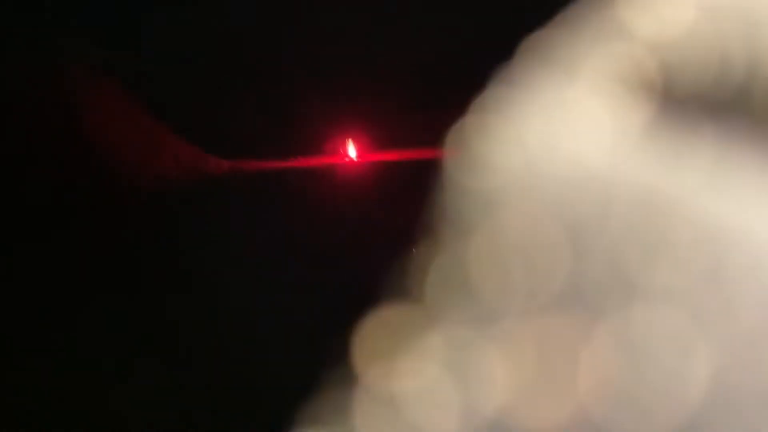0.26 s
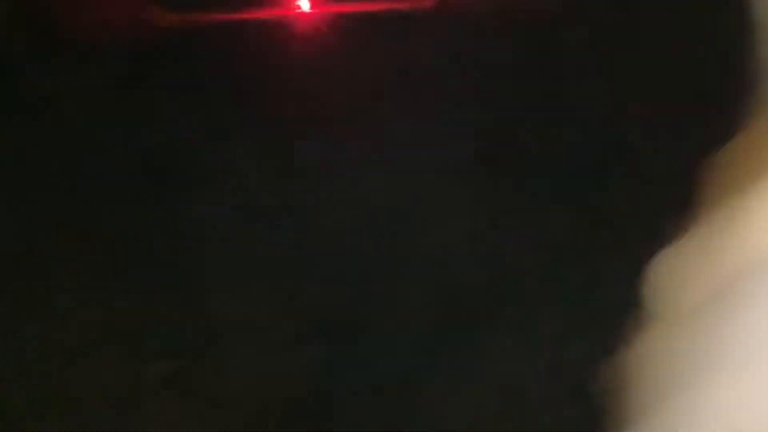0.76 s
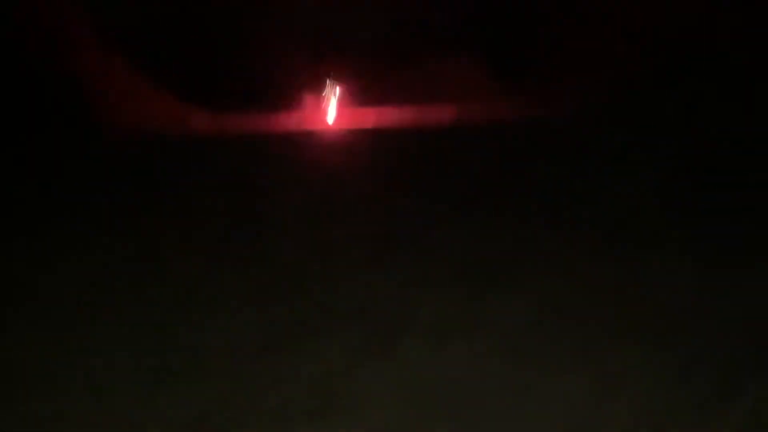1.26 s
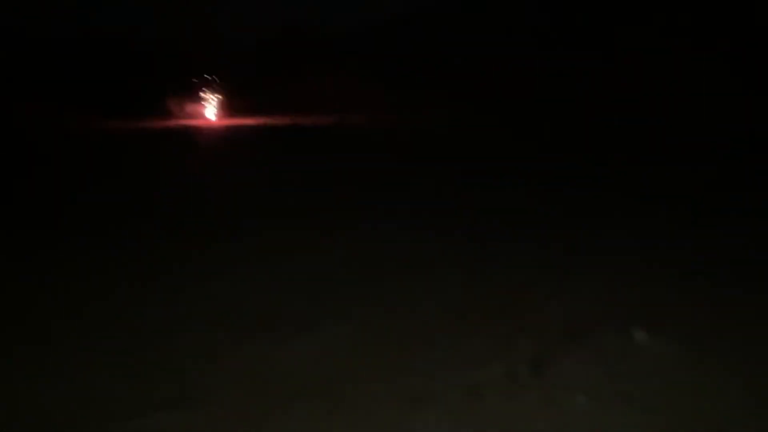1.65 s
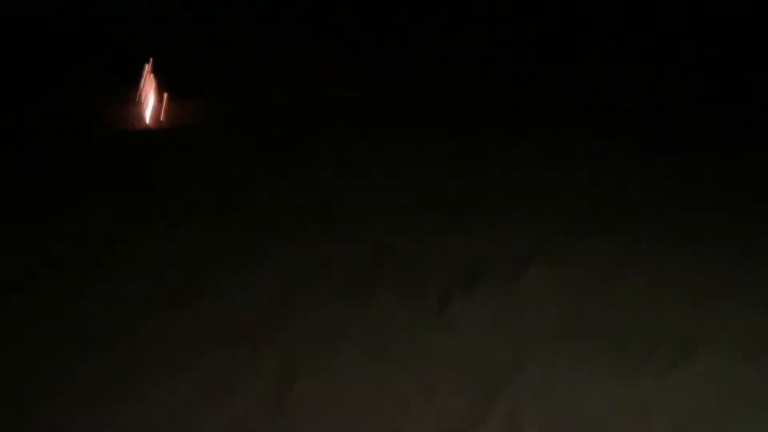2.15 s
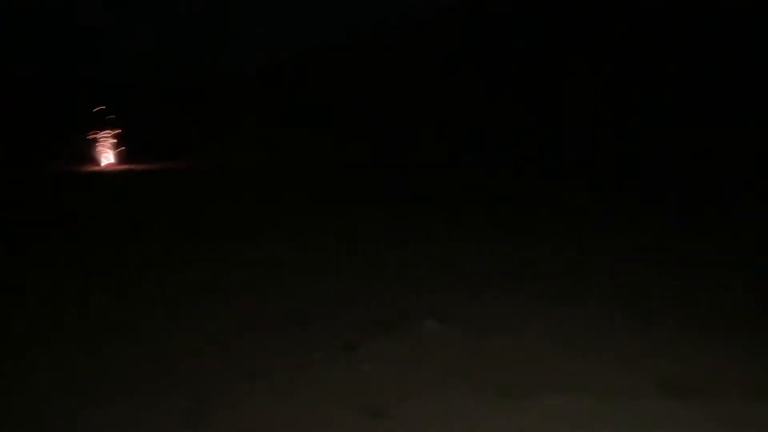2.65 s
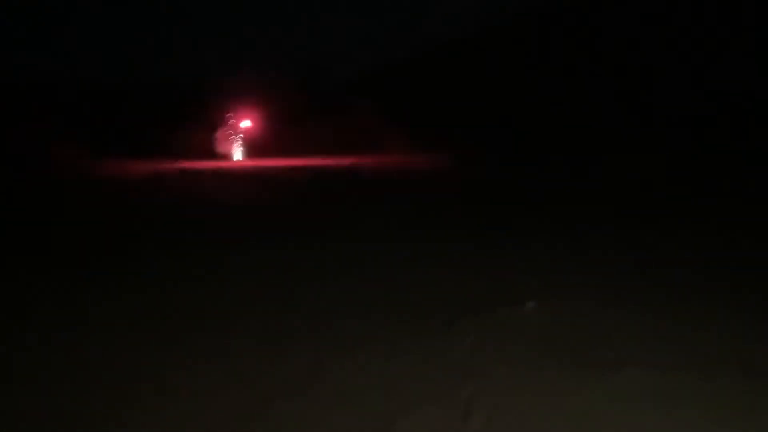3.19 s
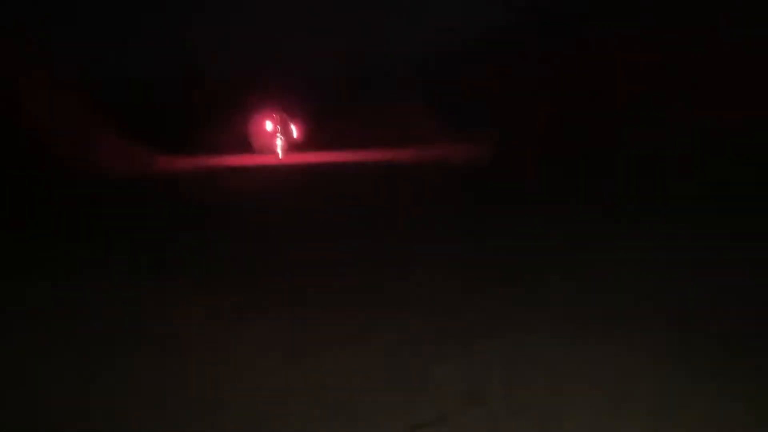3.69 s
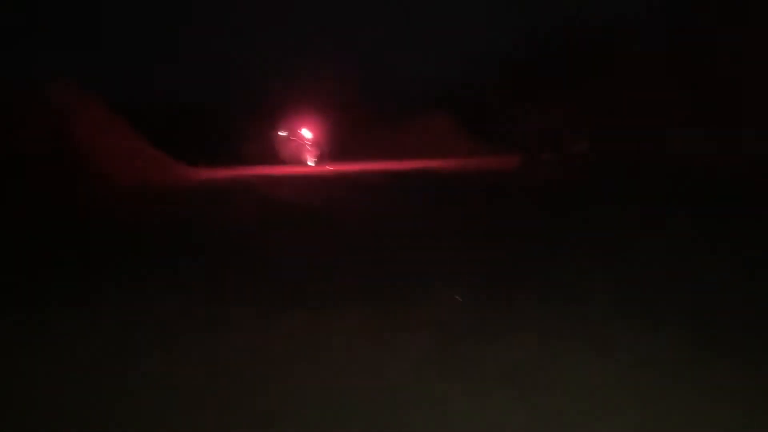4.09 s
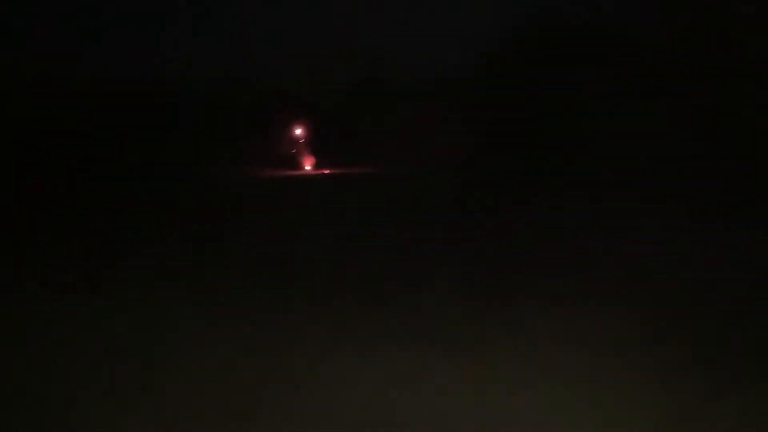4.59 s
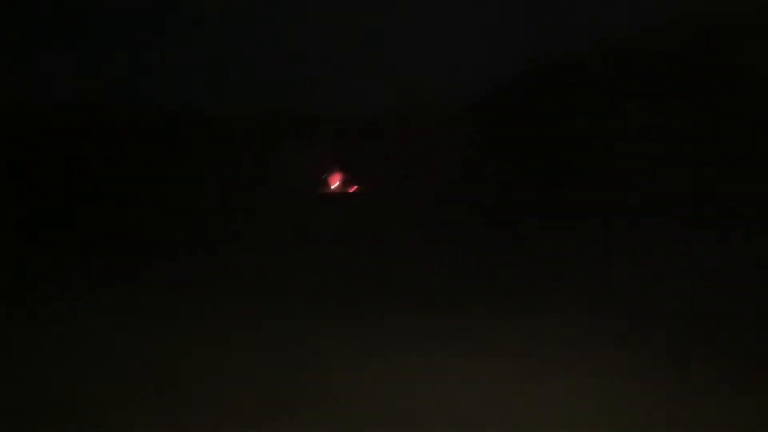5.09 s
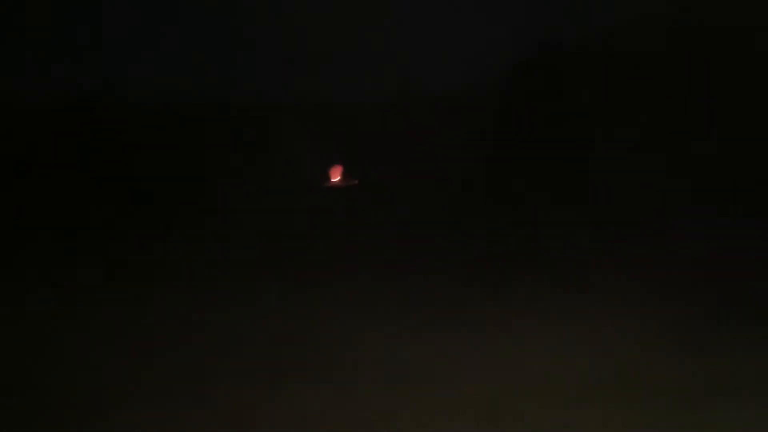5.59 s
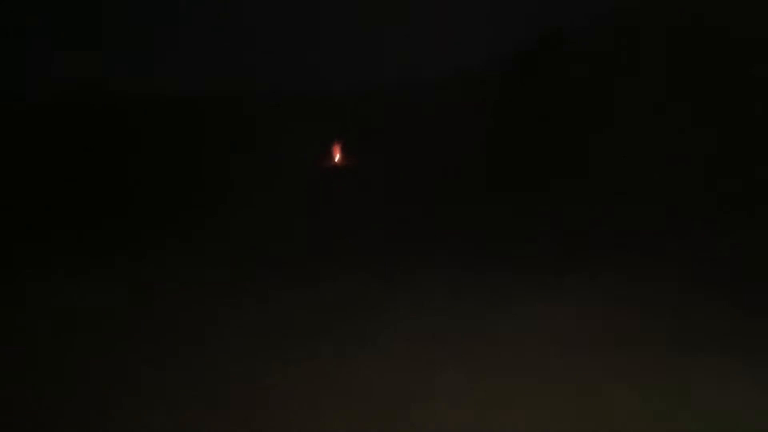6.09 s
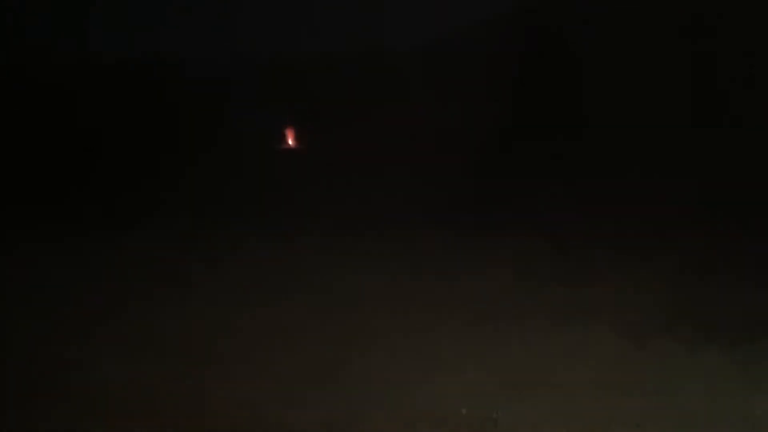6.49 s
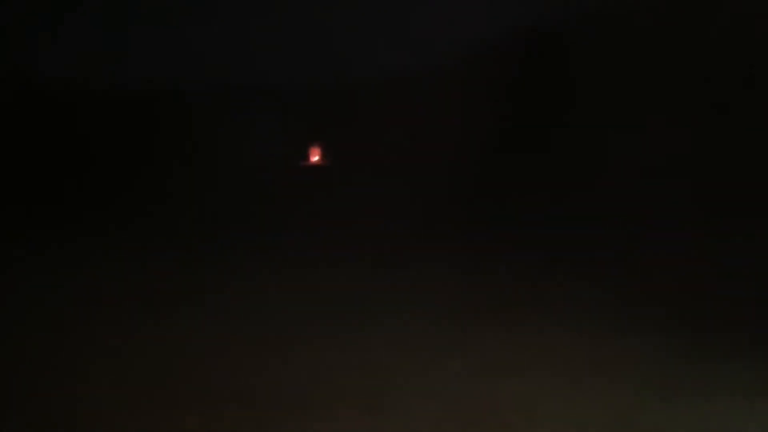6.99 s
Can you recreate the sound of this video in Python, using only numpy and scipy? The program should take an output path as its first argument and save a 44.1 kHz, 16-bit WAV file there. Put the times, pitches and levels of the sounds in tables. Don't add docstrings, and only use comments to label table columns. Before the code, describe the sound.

A ground firework sputters and crackles alight, then screams with a shrill whistle gliding steadily down in pitch, while wind buffets the microphone.

```python
import sys
import numpy as np
from scipy import signal
from scipy.fft import rfft, irfft, next_fast_len
from scipy.io import wavfile
from scipy.ndimage import uniform_filter1d

SR = 44100
rng = np.random.default_rng(int(sys.argv[2]) if len(sys.argv) > 2 else 0)


def transcribe(u):
    v = np.clip(np.atleast_2d(u).T, -1, 1)
    q = np.round(v * 32767).astype(np.int16)
    wavfile.write(sys.argv[1], SR, q)


def amplitude_ratio(level_db):
    exponent = np.asarray(level_db, float) / 20
    return 10 ** exponent


N = 319725
T = np.arange(N) / SR

# time in seconds, pitch in Hz.
PITCH = [(.7, 3866), (1.0, 3627), (1.28, 3493), (1.56, 3103), (1.84, 2879), (2.4, 2524), (2.6, 2452),
         (2.82, 2328), (2.96, 2261), (3.2, 2280), (3.66, 2136), (3.94, 2060), (4.25, 2005), (5.06, 1922),
         (5.5, 1840), (6.0, 1762), (6.75, 1692), (7.25, 1652)]
# time in seconds, whistle in dB, overtones in dB,
# brightness in dB per multiple.
SCREAM = [(.2, -60.5, -68, -9), (.5, -32.5, -62, 0.1), (.86, -31, -45, 0.1), (1.0, -23.5, -42, 2),
          (1.28, -25.5, -25, -18), (1.5, -15.5, -37, 5), (1.82, -3, -13.5, 4.5), (2.12, -18, -28, -6),
          (2.4, -20, -30.5, -3.5), (2.56, -24.5, -40.5, -11), (3.05, -18.5, -31.5, -13),
          (3.5, -23.5, -36, -4), (3.88, -19.5, -23, 0.5), (4.7, -20, -30.5, -3), (5.3, -23.5, -24, -2.5),
          (5.76, -24, -28.5, -4.5), (6.15, -24.5, -33, -1), (7.25, -27.5, -40, 1.5)]
# time in seconds, raggedness (a factor),
# share of clean tone from 0 to 1, sparks per second.
BURNING = [(0, 1.5, 0, 30), (.5, 1.5, 0, 60), (.82, 1.5, 0, 200), (.95, 1.6, .1, 400), (1.05, 1.6, .5, 80),
           (1.2, 1.8, .7, 30), (1.55, 2.0, .55, 0), (1.95, 2.1, .6, 0), (2.15, .7, .97, 0),
           (2.45, .7, .93, 0), (2.6, 1.0, .8, 0), (2.8, .7, .9, 0), (3.0, .5, .95, 0), (3.9, .5, .97, 0),
           (4.1, .32, .98, 0), (7.25, .28, .98, 0)]
# multiple of the pitch, level in dB.
OVERTONES = [(2, -15.5), (3, -13.5), (4, -16.5), (5, -23.5), (6, -31)]
# time in seconds, its own level in dB, level of its mixing tones in dB.
LOW_TONE = [(.41, -56, -58), (1.56, -24, -36), (2.1, -31, -40), (2.45, -31.5, -48), (2.7, -31.5, -30),
            (3.0, -31.5, -27), (3.35, -33, -32.5), (3.6, -40.5, -33.5), (3.9, -40, -40), (4.2, -61, -35),
            (4.55, -48, -30.5), (4.8, -43, -30), (5.4, -39.5, -27.5), (5.75, -38.5, -39),
            (6.1, -44.5, -36.5), (6.6, -42.5, -46), (6.95, -42, -36), (7.25, -37, -35)]
# multiple of the whistle, multiple of the low tone,
# level in dB.
MIXING = [(0, 1, -4), (1, -1, -6.5), (0.999, 1, -3), (1.999, 1, -13.5), (3, 1, -14.5)]
# time in seconds, rise in seconds, fall in seconds, pitch lift in Hz.
HITCHES = [
    (1.8, .2, 0.059, 70),
    (2.66, 0.021, 0.12, 40.5),
    (3.735, 0.0952, 0.028, 22.5),
    (3.77, 0.035, 0.0378, -19.5),
    (3.86, 0.088, 0.013, 63.5),
    (1.84, 0.0385, 0.016, -69),
    (2.1, 0.0597, 0.0184, -61.5),
    (3.21, 0.1107, 0.108, 12),
    (6.8, 0.066, 0.092, -13),
    (5.55, 0.0667, 0.021, 20),
]
# time in seconds, half length in seconds,
# whistle lost in dB (negative is a gain).
STUMBLES = [
    (3.071, 0.0069, -2),
    (5.432, 0.09, -2),
    (6.023, 0.029, 9),
    (6.748, 0.0044, 13),
    (7.0, 0.025, 4),
    (7.101, 0.022, 9),
    (7.179, 0.028, 9),
]
# frequency in Hz, level in dB.
ROAR_COLOUR = [(2800, -37), (4000, 9), (5200, 14), (6800, -21), (9000, -16)]
# time in seconds, level in dB.
JET = [(0, -51), (.13, -70), (.19, -72), (.5, -49), (.86, -54.5), (1.0, -41.5), (1.35, -38), (1.6, -38),
       (1.85, -28.5), (2.3, -48.5), (2.9, -43.5), (3.4, -49), (4.3, -51), (5.3, -43), (5.8, -43.5),
       (6.3, -57), (7.25, -47.5)]
# frequency in Hz, level in dB.
HISS = [(400, -8.5), (900, 3.5), (1800, 9), (3500, 6), (6000, 5), (9000, -56), (12000, -56)]
# frequency in Hz, level in dB.
DAMP_HISS = [(400, -9), (1700, 7.5), (2700, -8), (3900, 10), (5200, -7), (8000, -14), (12000, 3),
             (16000, -4)]
# crest in seconds, rise in seconds,
# fall in seconds, level in dB.
FLARES = [
    (0.93, 0.23, 0.8, 19.5),
    (.76, .05, .06, 19),
    (1.6, 1, 1.34, 18.5),
    (2.76, 0.63, 0.86, 21),
    (3.95, 0.71, 0.48, 22.5),
    (4.2, 0.36, 0.45, 21.5),
    (5.5, 0.19, 0.8, 19.5),
    (6.9, 0.27, 0.27, 6),
    (3.25, 0.35, 0.28, 15),
    (4.62, 0.22, 0.23, 8.5),
]
# frequency in Hz, level in dB.
FIZZ_COLOUR = [(2500, -42), (4300, -18), (6500, -6), (10000, -8), (13000, -17), (15500, -14.5)]
# time in seconds, level in dB.
EARLY_POPS = [(0.0237, -40), (0.0884, -39), (.3303, -39), (0.3416, -33.5), (0.391, -37), (0.522, -17.5),
              (0.5256, -31), (.603, -34.5), (0.407, -32), (.432, -25), (0.4639, -21.5), (.5023, -40),
              (0.5327, -23), (0.5561, -21), (0.58, -51), (0.5958, -25.5), (0.616, -19), (.629, -42),
              (0.6509, -12), (0.664, -22.5), (0.686, -57), (0.7147, -15.5), (0.76, -17.5), (0.7785, -32),
              (0.7947, -13.5)]
# time in seconds, level in dB, choke of
# the whistle in dB.
CRACKS = [(.853, -28, -2), (0.8619, -25, 5), (0.895, -27, -2), (0.903, -18, -10), (.925, -29, -1),
          (.961, -19, 0), (1.162, -38, 2), (1.198, -39, 3), (1.225, -34, 12), (1.238, -25, -4),
          (1.287, -29, -3.5), (0.8833, -29, 8), (.944, -17, -4), (1.138, -20, 20), (.824, -19.5, 15.5),
          (0.848, -17, -4), (0.8766, -15, -8), (0.9105, -16, 9), (0.931, -13, 8), (0.9562, -14, -15),
          (0.969, -19.5, 22), (.988, -25.5, 4.5), (0.9999, -25, -7), (1.009, -13.5, 16), (1.03, -16, 5.5),
          (1.045, -4, 19), (1.079, -11.5, 21), (1.1066, -11, 15), (1.0637, -28, 2), (1.179, -35, 3),
          (1.328, -22, 1), (1.337, -28, 0), (1.343, -30, 3), (1.374, -37, 1), (1.385, -20, 3),
          (1.394, -46, 5), (1.432, -21, 2), (1.666, -38, 1), (1.807, -22, 6), (1.1275, -6.5, 7),
          (1.1575, -9, 18), (1.2432, -15, 14), (1.2667, -28, 10.5), (1.3015, -22, 1.5), (1.315, -15, 5),
          (1.351, -26.5, 12), (1.415, -32, 8), (1.448, -16, 23), (1.504, -25, 13), (1.5587, -17.5, 21.5),
          (1.8477, -15.5, 19.5)]
# frequency in Hz, level in dB.
CRACK_COLOUR = [(1500, 0), (3000, 11.5), (5000, 12.5), (9500, 13.5), (13000, 0), (16000, 2)]
# frequency in Hz, level in dB.
PATH = [(4300, 0), (5000, -6), (5600, 0), (8300, 0), (9000, -6), (9800, -3), (12000, -6), (15500, -12),
        (16500, -50)]
# frequency in Hz, lead of the left port in radians.
LEAD = [(1600, .1), (2240, 2.42), (2750, 3.8), (4350, 6.25), (5150, 7.3), (6400, 6.8), (8870, 8.6),
        (9900, 6.35)]
# frequency in Hz, time to fall by 60 dB in seconds.
YARD = [(500, 0.4), (2000, 0.51), (8000, 0.053)]
# time in seconds, level in dB, centre in Hz, left over right in dB.
SLAPS = [(0.06, -24, 126, 14), (0.48, -15.5, 202, 2), (.501, -15, 420, -8), (0.52, -6, 310, -2),
         (0.54, -6.5, 274, -4), (0.597, -11, 390, -8), (0.614, -13, 141, 6), (0.722, -22, 312, -7),
         (0.84, -18, 204, 15), (0.897, -17.5, 228, 9), (1.035, -11.5, 235, 6), (1.158, -12.5, 239, 13.5),
         (1.222, 0, 145, 2), (.935, -15, 110, 2), (1.172, -18, 95, 3), (.643, -20, 520, -8),
         (.735, -24, 450, -3), (1.207, -17, 300, 0), (.757, -22, 510, -11), (.785, -26, 330, -4),
         (.812, -23, 590, -12), (5.83, -25, 420, -8), (1.51, -14, 419.5, -10), (2.038, -10, 171, 8),
         (2.59, -14, 122, 3), (2.685, -4, 343.5, -5), (2.686, -4.5, 735, -13), (0.542, -12, 920, -17),
         (0.604, -13, 990, -13), (.523, -16, 800, -17), (2.803, -4.5, 257, 5), (2.814, -6.5, 128, 0),
         (2.968, -16, 196, -7), (3.284, -21, 182, -5), (3.964, -13.5, 186, 6), (5.409, -14.5, 197, 0),
         (5.488, -12, 99.9, -7), (5.513, -11.5, 149, -5), (5.792, -33, 139.4, -.5), (5.799, -21.5, 331, 2),
         (5.815, -24, 300, 4), (5.858, -26, 291, -4), (4.069, -34, 600, -15), (5.876, -10.5, 98, -1)]
# time in seconds, level in dB.
WIND = [(0.0, -39), (.3, -43), (.58, -32), (.72, -38.5), (.89, -20.5), (1.08, -34.5), (1.2, -26.5),
        (1.38, -37.5), (1.71, -20.5), (2.16, -22.5), (2.3, -33.5), (2.75, -22.5), (2.9, -30), (4.2, -37.5),
        (5.25, -40), (5.5, -34), (6.2, -43), (7.1, -35.5)]
# time in seconds, half length in seconds, rumble in dB, flutter in dB.
BUFFETS = [(0.071, 0.13, -28.5, -39.5), (0.541, 0.12, -27, -16.5), (0.62, 0.095, -27, -15),
           (0.787, 0.13, -34, -24), (1.168, 0.041, -30, -17.5), (1.238, 0.077, -20, -22),
           (1.689, 0.15, -30, -24), (2.594, 0.027, -28, -17.5), (2.699, 0.024, -41, -13.5),
           (2.814, 0.027, -28, -21.5), (3.6, 0.24, -31, -32.5), (4.158, 0.065, -22.5, -32.5),
           (4.368, 0.14, -28.5, -48), (5.491, 0.049, -35, -35.5), (5.81, 0.056, -27.5, -29.5),
           (5.876, 0.054, -21.5, -28), (6.623, 0.14, -37.5, -41), (6.98, 0.062, -25.5, -35),
           (7.148, 0.047, -21.5, -32.5)]
# frequency in Hz, level in dB.
RUMBLE = [(20, -46.5), (35, -15.5), (55, -2), (90, 0.5), (150, -10), (300, -41), (600, -67), (2000, -100)]
# frequency in Hz, level in dB.
FLUTTER = [(60, -44), (140, 5), (250, 2), (400, -4.5), (700, -16), (1200, -19), (2000, -40.5), (4000, -100)]
# start in seconds, end in seconds,
# low edge in Hz, high edge in Hz, share of the time lost from 0 to 1.
HOLES = [
    (.5, 1.45, 2380, 2750, .7),
    (1.45, 2.1, 2380, 2560, .75),
    (1.3, 5.3, 8750, 9300, .55),
    (5.3, 7.25, 8750, 9100, .12),
    (1.6, 3.9, 4950, 5150, .3),
    (2.1, 7.25, 7050, 7400, .12),
    (4.4, 7.25, 11800, 14000, .35),
    (1.2, 7.25, 12500, 14500, .4),
    (1.2, 7.25, 14500, 16600, .75),
    (2, 7.25, 9250, 12500, .1),
]


def evened(x):
    return x / np.sqrt(np.mean(x ** 2) + 1e-20)


def read(points, hz):
    f, value = np.transpose(points)
    return np.interp(np.log(hz + 1), np.log(f + 1), value)


def column(rows, k):
    return np.interp(T, np.array(rows)[:, 0], np.array(rows)[:, k])


def coloured(x, points):
    n = x.shape[-1]
    return irfft(rfft(x) * amplitude_ratio(read(points, np.fft.rfftfreq(n, 1 / SR))), n)


def drift(rate_hz, channels=1):
    white = rng.standard_normal((channels, N))
    return evened(signal.lfilter(*signal.butter(2, rate_hz, fs=SR), white))


def swell(s, rise, fall):
    return np.interp(T, [s - rise, s, s + fall], [0, 1, 0])


def wave(turns):
    return np.cos(2 * np.pi * turns)


def fuzz(turns, width_hz):
    a, b = drift(width_hz, channels=2)
    return a * wave(turns) + b * np.sin(2 * np.pi * turns)


def add(mix, s, sound):
    part = mix[..., round(s * SR):][..., :sound.shape[-1]]
    part += sound[..., :part.shape[-1]]


def tube_tone(turns, clean):
    halo = 0.8 * clean * fuzz(turns, 248) + 0.23 * fuzz(1.03 * turns, 1250)
    clear = np.sqrt(2) * wave(turns) + 0.33 * fuzz(turns, 52)
    return np.sqrt(clean) * clear + np.sqrt(1 - clean) * halo


def overtones(turns, pitch):
    out, bright_db = np.zeros(N), column(SCREAM, 3)
    for k, db in OVERTONES:
        faint_db = -np.maximum(k * pitch - 11000, 0) / 250
        line = 0.82 * wave(k * turns) + 0.36 * fuzz(k * turns, 28 * k)
        out += amplitude_ratio(db + faint_db + (k - 3) * bright_db) * line
    return out


def mixing_tones(turns, pitch, glide, clean, unrest):
    free_hz = 1202
    free_pitch = free_hz * (1 + 0.0068 * unrest * drift(32.2)[0])
    low = np.cumsum(np.minimum(pitch / 2, free_pitch)) / SR
    locked = np.clip((2.1 * free_hz - glide) / 200, .1, 1)
    sharp = clean * np.interp(glide, [2100, 2250], [.35, 1])
    low_db, mixing_db = column(LOW_TONE, 1), column(LOW_TONE, 2)
    out = np.zeros(N)
    for k, m, db in MIXING:
        both = k * turns + m * low
        level = amplitude_ratio(db + (mixing_db if k * m > 0 else low_db)) * locked ** (k > 1)
        out += level * (0.5 * sharp * wave(both) + 0.31 * fuzz(both, 40 + 20 * k))
    return out + amplitude_ratio(mixing_db - 15.5 + 7.4 * swell(2.95, .2, 0.32)) * fuzz(.86 * turns, 60)


def whistle():
    unrest, clean = column(BURNING, 1), np.clip(column(BURNING, 2), 0, 1)
    glide = column(PITCH, 1) + sum(hz * swell(s, rise, fall) for s, rise, fall, hz in HITCHES)
    uneven = 1 + .003 * drift(5)[0]
    shaky = 1 + .006 * unrest * drift(35)[0] + .007 * unrest * drift(160)[0]
    pitch = glide * uneven * shaky
    turns = np.cumsum(pitch) / SR
    lost_db = sum(db * swell(s, half, half) for s, half, db in STUMBLES)
    flicker = amplitude_ratio(0.12 * unrest * np.tanh(drift(100)[0]) - lost_db)
    settled = np.interp(T, [1.2, 1.8], [0, 1])
    upper = amplitude_ratio(column(SCREAM, 2)) * overtones(turns, pitch)
    upper += mixing_tones(turns, pitch, glide, clean, unrest)
    return flicker * (amplitude_ratio(column(SCREAM, 1)) * tube_tone(turns, clean) + settled * upper)


def roar():
    rush = rng.standard_normal(N) * amplitude_ratio(3.2 * drift(70)[0])
    return amplitude_ratio(-31) * swell(1.45, 0.5, .62) * evened(coloured(rush, ROAR_COLOUR))


def choke(regrow_s):
    dip_db, u = np.zeros(N), np.arange(2500) / SR
    early = [(*row, 10.5) for row in EARLY_POPS]
    for s, _, depth_db in early + CRACKS:
        dip = np.minimum(u / 0.00056, 1) * np.exp(-(u / regrow_s) ** 2)
        add(dip_db, s + 0.0029, max(depth_db, 0) * dip)
    return amplitude_ratio(-np.minimum(dip_db, 30))


def flame():
    sputter = amplitude_ratio(2.0 * drift(90)[0]) * amplitude_ratio(1.0 * drift(8.3)[0])
    calming = np.interp(T, [2, 2.4], [1, .4])
    jet, edge = rng.standard_normal((2, N)) * sputter ** calming
    caught = np.interp(T, [.85, 1.05], [0, 1])
    hiss = caught * evened(coloured(jet, HISS))
    hiss += (1 - caught) * amplitude_ratio(1.5) * evened(coloured(jet, DAMP_HISS))
    spark_size = amplitude_ratio(4.2 * np.minimum(rng.exponential(1, N), 3)) * rng.choice([-1, 1], N)
    sparks = (rng.random(N) < column(BURNING, 3) / SR) * spark_size
    body = amplitude_ratio(column(JET, 1) + 0.5) * (hiss + 3.7 * coloured(sparks, CRACK_COLOUR))
    flare_db = np.max([db * np.minimum(1.3 * swell(s, rise, fall), 1)
                       for s, rise, fall, db in FLARES], axis=0)
    unlit_db = -14.5 * swell(.2, 1, .3)
    fizz = amplitude_ratio(-61.5 + unlit_db + flare_db) * amplitude_ratio(1.0 * drift(6)[0])
    fizz = fizz * evened(coloured(edge, FIZZ_COLOUR))
    return body * choke(0.013) + fizz * choke(0.01)


def pops():
    out, u, pitch = np.zeros(N), np.arange(600) / SR, column(PITCH, 1)
    grit = rng.standard_normal((len(EARLY_POPS + CRACKS), 600))
    for (s, db, *_), g in zip(EARLY_POPS + CRACKS, grit):
        away = abs(u - .0015)
        burst = g * np.exp(-away / np.where(u < .0015, .00015, .0007))
        shock = 2.0 * (np.arange(600) == 66) + burst
        crack = coloured(shock, CRACK_COLOUR + [(17000, -37.0)])
        ring = np.sin(2 * np.pi * pitch[round(s * SR)] * 1.139 * u) * np.exp(-away / 0.00018)
        ring_db = -15.5 + 0.16 * db + min(db + 29.5, 0)
        add(out, s, amplitude_ratio(db) * 1.02 * crack / abs(crack).max() + amplitude_ratio(ring_db) * ring)
    return out


def ports(x):
    n = next_fast_len(N + 2048)
    half = np.exp(.5j * read(LEAD, np.fft.rfftfreq(n, 1 / SR)))
    return irfft(rfft(x, n) * np.array([half, 1 / half]), n)[:, :N]


def yard(x):
    taps = np.zeros((2, SR // 2))
    at = np.arange(200, SR // 2 - 20, 20) + rng.integers(0, 20, (2, (SR // 2 - 201) // 20))
    np.put_along_axis(taps, at, rng.choice([-1., 1.], at.shape), 1)
    hz, t, z = signal.stft(taps, SR, nperseg=256)
    fade = amplitude_ratio(-60 * t / read(YARD, hz)[:, None])
    tail = signal.istft(z * fade, SR, nperseg=256)[1]
    return signal.fftconvolve(x[None], tail / np.linalg.norm(tail[0]), axes=1)[:, :N]


def slaps():
    out, u = np.zeros((2, N)), np.arange(2200) / SR
    band = signal.butter(4, [300, 1400], "band", fs=SR)
    grit = signal.lfilter(*band, rng.standard_normal((len(SLAPS), 2, 2200)))
    for (s, db, hz, pan_db), g in zip(SLAPS, grit):
        hump = np.sin(np.pi * np.minimum(u * hz / 3.05, 1)) ** 2
        push = hump * np.sin(2 * np.pi * hz * u * (1.2 - 8 * u))
        rasp_db = -29 + 0.0631 * np.clip(hz - 250, 0, 140)
        rasp = np.sin(np.pi * np.minimum(u / 0.014, 1)) ** 2 * g * 5.4 * amplitude_ratio(rasp_db)
        sides = amplitude_ratio(np.array([[pan_db / 2], [-pan_db / 2]]))
        add(out, s, amplitude_ratio(db - 5.0) * sides * (push + rasp))
    return out


def gusts(steady, k, points, shared, lump_db, lump_hz):
    a, b, c = rng.standard_normal((3, N))
    pair = np.sqrt(shared) * a + np.sqrt(1 - shared) * np.array([b, c])
    buffets = [amplitude_ratio(row[k]) * swell(row[0], row[1], row[1]) ** 2 for row in BUFFETS]
    push = np.max([steady] + buffets, axis=0)
    lumps = amplitude_ratio(lump_db * np.tanh(drift(lump_hz)))
    return push * evened(coloured(pair, points) * lumps)


def wind():
    gust_db = column(WIND, 1)
    flutter_db = -40.5 + 0.78 * (gust_db + 35.5)
    rumble = gusts(amplitude_ratio(gust_db), 2, RUMBLE, shared=0.68, lump_db=3.1, lump_hz=20.0)
    return rumble + gusts(amplitude_ratio(flutter_db), 3, FLUTTER, shared=0.042, lump_db=7.3, lump_hz=20.2)


def night_air():
    colour = [(200, -8.0), (1500, 32.0), (4000, -16), (9000, -23), (16000, -57)]  # (Hz, dB)
    return amplitude_ratio(-62) * evened(coloured(rng.standard_normal((2, N)), colour))


def masked(x):
    hz, t, z = signal.stft(x.mean(0), SR, nperseg=1024)
    pitch = np.interp(t, *np.transpose(PITCH))
    above = hz[:, None] > pitch + 360
    below = hz[:, None] < np.maximum(pitch + 620, 3040)
    share = .82 * (above & below & (t > 2.05))
    for start, end, low, high, part in HOLES:
        share += part * np.outer((hz > low) & (hz < high), (t > start) & (t < end))
    chance = np.repeat(np.repeat(rng.random((len(t) // 4 + 1, 65)), 4, axis=0), 8, axis=1)
    lost = z * (chance[:len(t), :len(hz)].T < share)
    return x - signal.istft(lost, SR, nperseg=1024)[1][:N]


def scene():
    cracks = pops()
    firework = coloured((whistle() + roar()) * choke(0.013) + flame(), PATH) + cracks
    skim = amplitude_ratio(-11) * np.roll(cracks, 6) * [[1], [-1]]
    echoes = amplitude_ratio(-25) * yard(firework)
    return ports(firework) + skim + echoes + slaps() + wind() + night_air()


def top_cut(x):
    return signal.sosfilt(signal.butter(12, 16620, fs=SR, output="sos"), x)


def record(dry):
    shrill = signal.lfilter(*signal.butter(2, 1500, "high", fs=SR), dry)
    power = abs(uniform_filter1d((shrill ** 2).mean(0), 130))
    power_db = 10 * np.log10(power + 1e-12)
    over_db = uniform_filter1d(np.maximum(power_db + 21.5, 0), 130)
    return top_cut(masked(dry) / amplitude_ratio(.6 * over_db))


dry = scene()
out = record(dry)
transcribe(out)
```